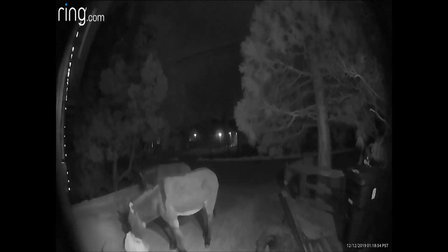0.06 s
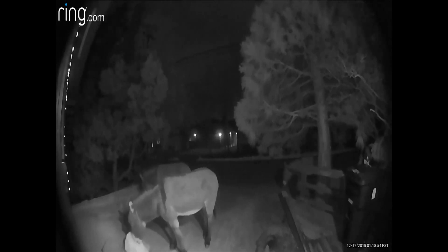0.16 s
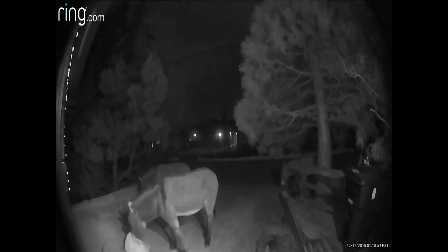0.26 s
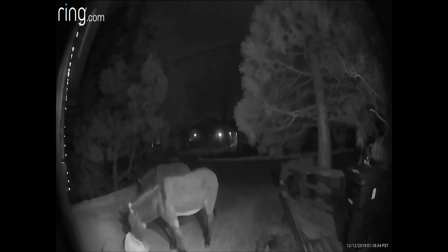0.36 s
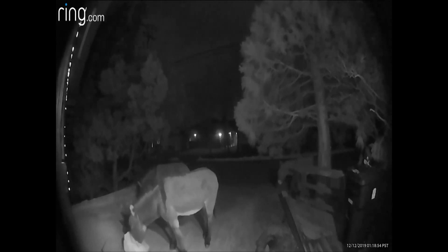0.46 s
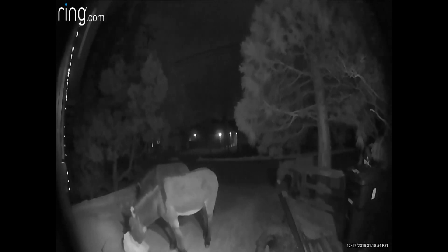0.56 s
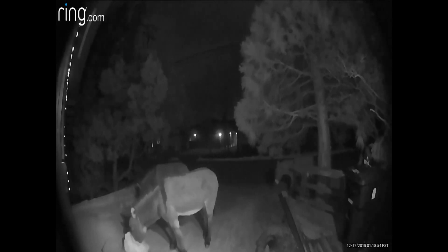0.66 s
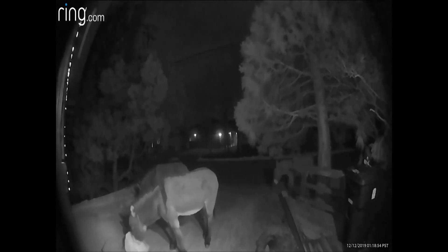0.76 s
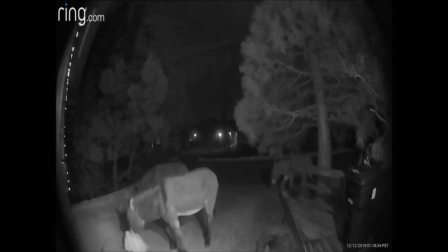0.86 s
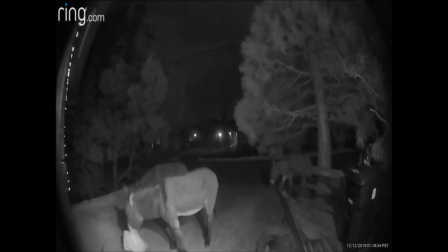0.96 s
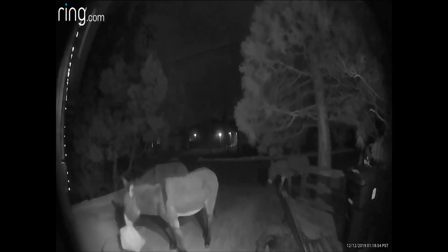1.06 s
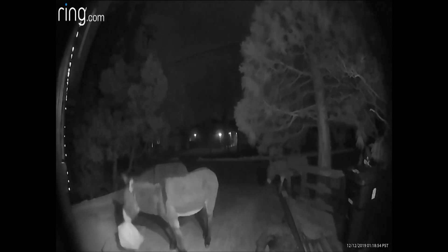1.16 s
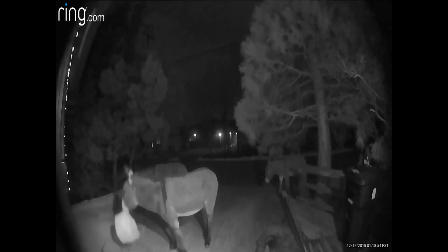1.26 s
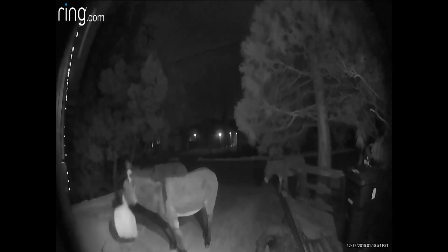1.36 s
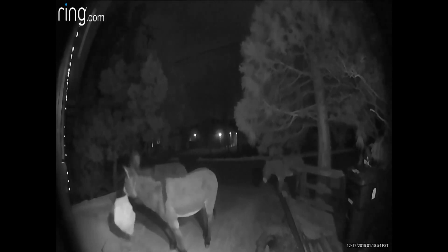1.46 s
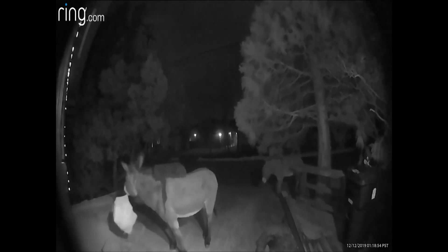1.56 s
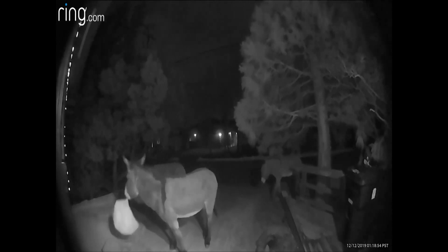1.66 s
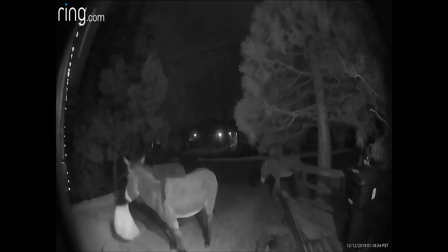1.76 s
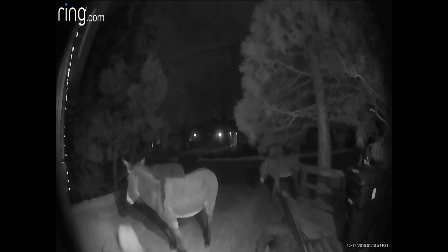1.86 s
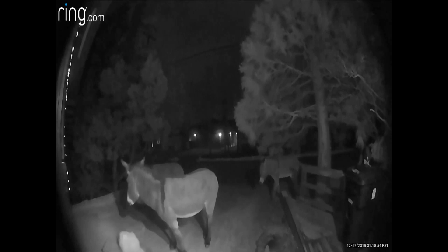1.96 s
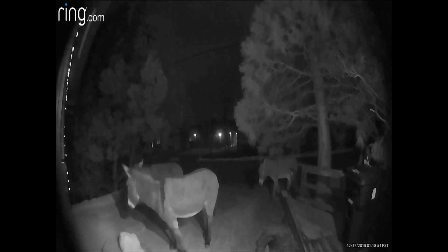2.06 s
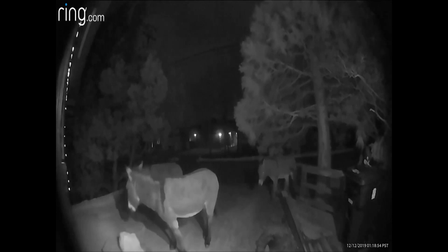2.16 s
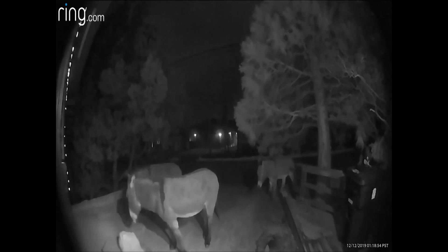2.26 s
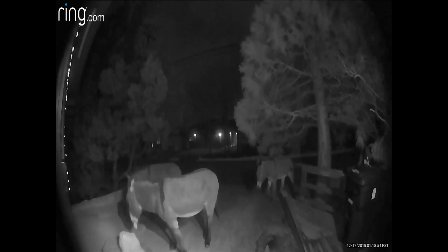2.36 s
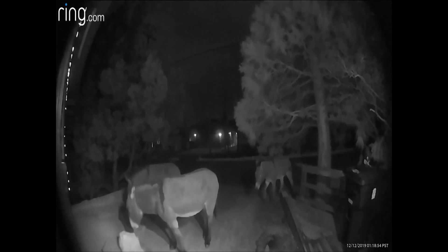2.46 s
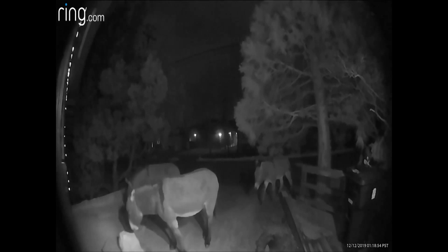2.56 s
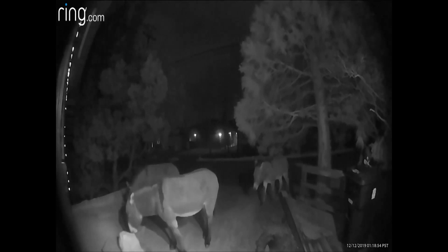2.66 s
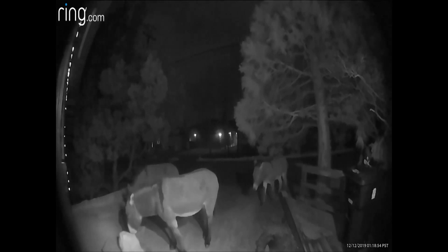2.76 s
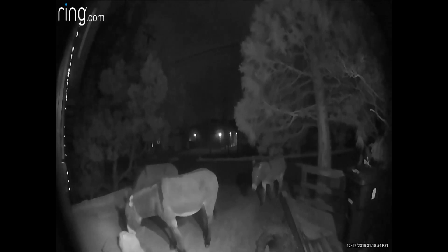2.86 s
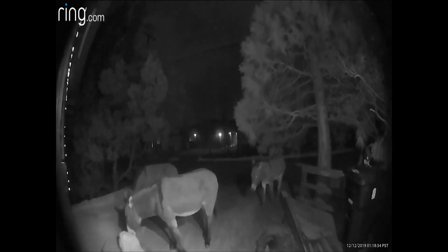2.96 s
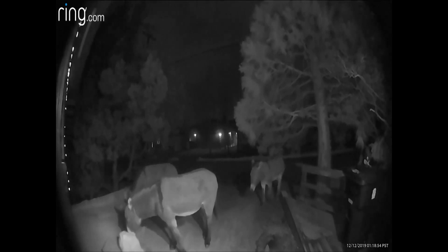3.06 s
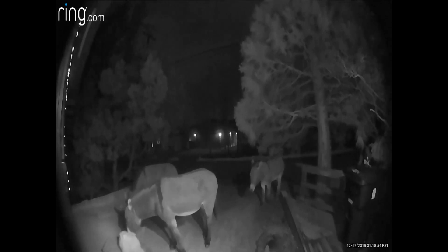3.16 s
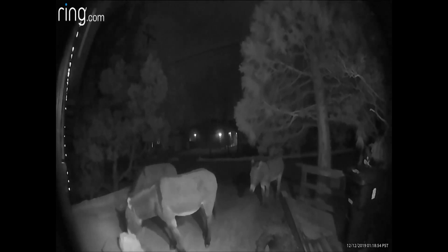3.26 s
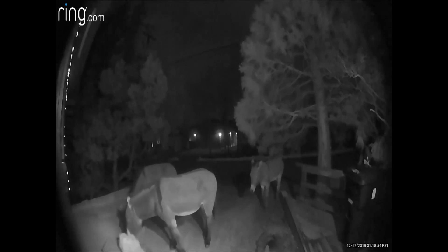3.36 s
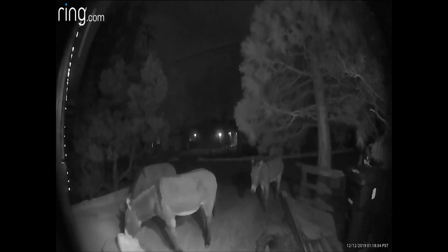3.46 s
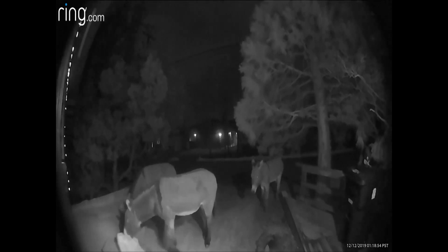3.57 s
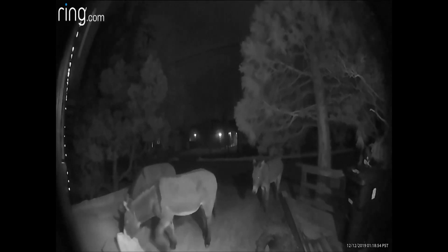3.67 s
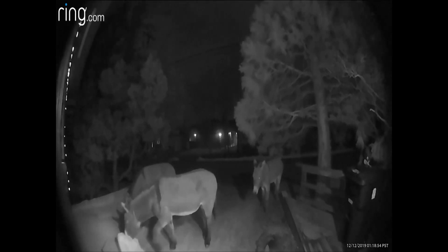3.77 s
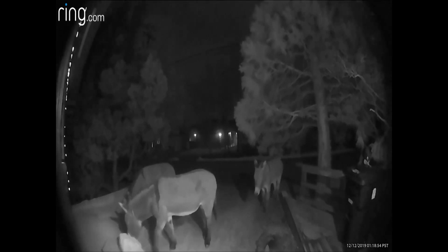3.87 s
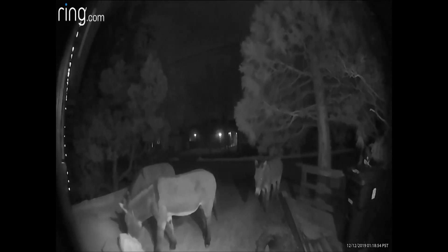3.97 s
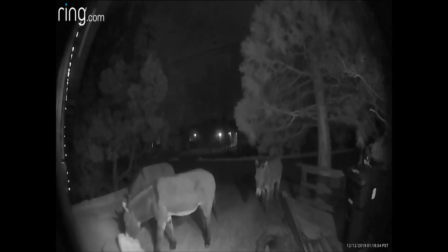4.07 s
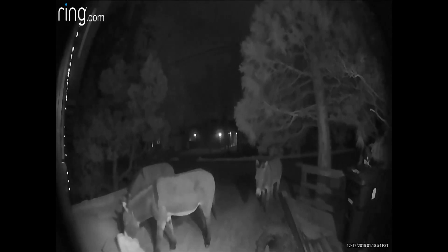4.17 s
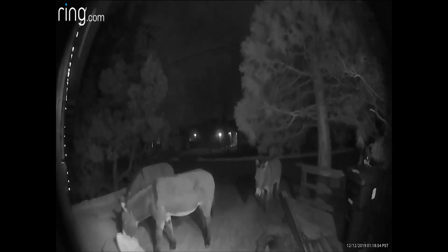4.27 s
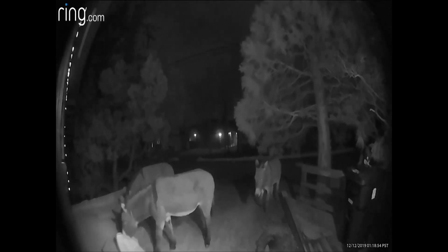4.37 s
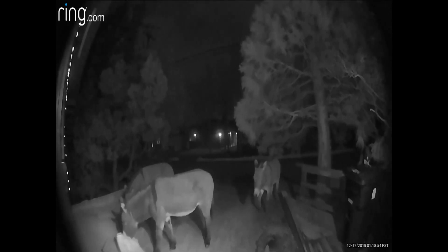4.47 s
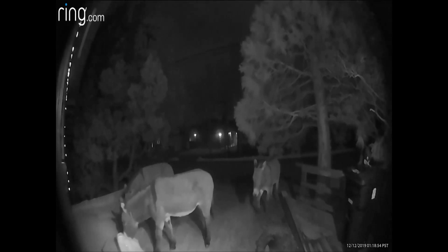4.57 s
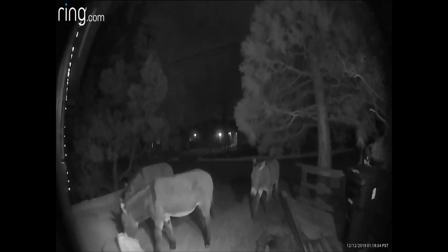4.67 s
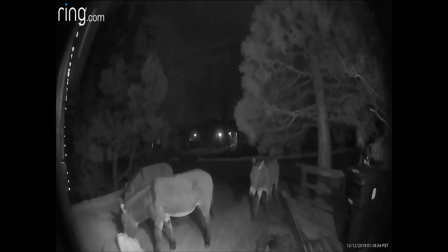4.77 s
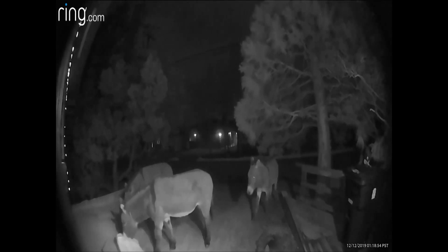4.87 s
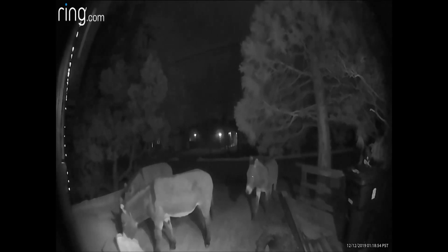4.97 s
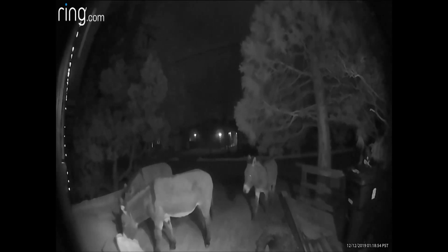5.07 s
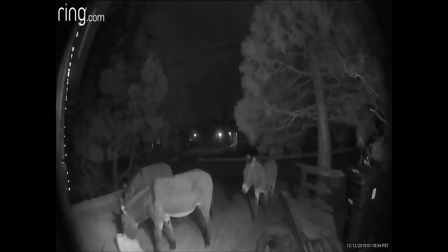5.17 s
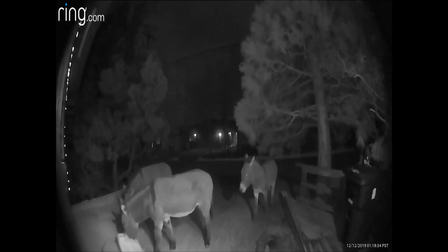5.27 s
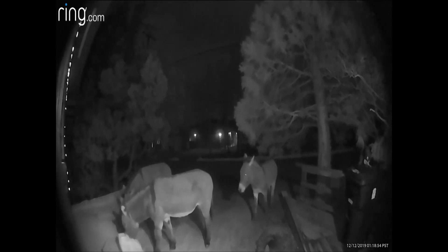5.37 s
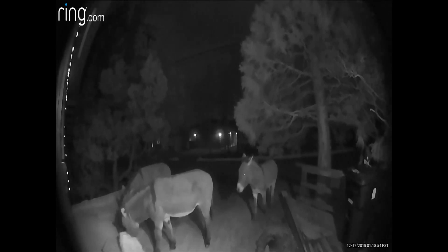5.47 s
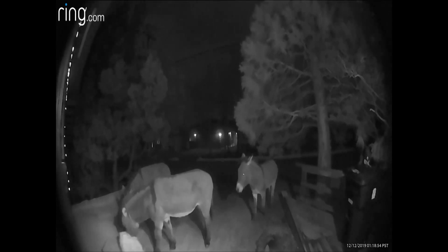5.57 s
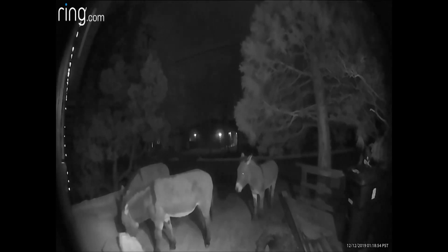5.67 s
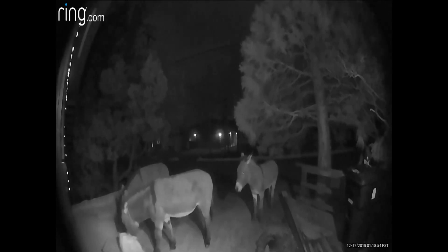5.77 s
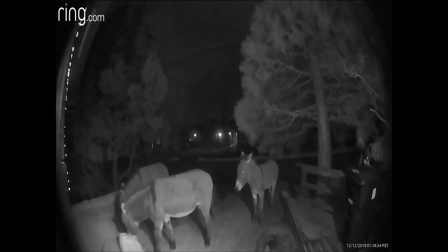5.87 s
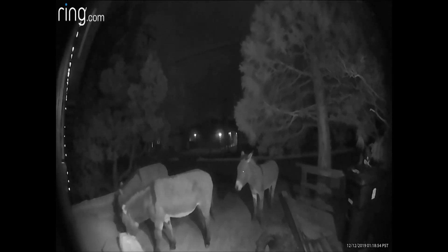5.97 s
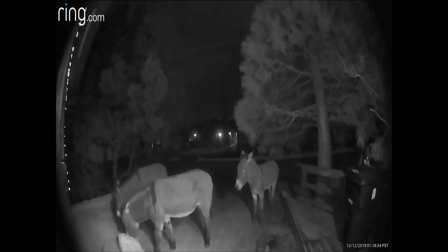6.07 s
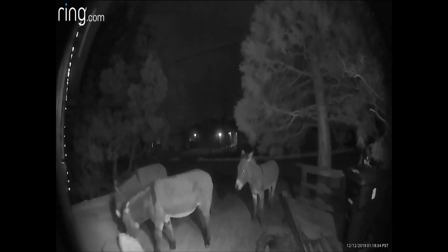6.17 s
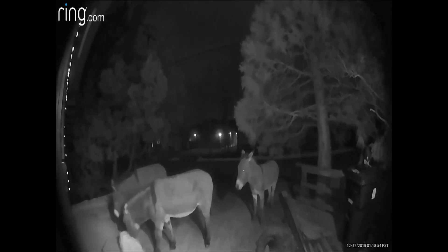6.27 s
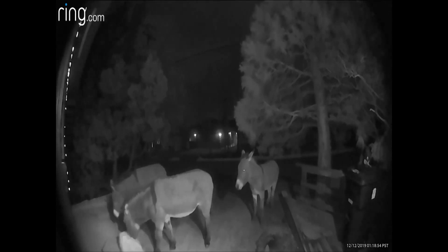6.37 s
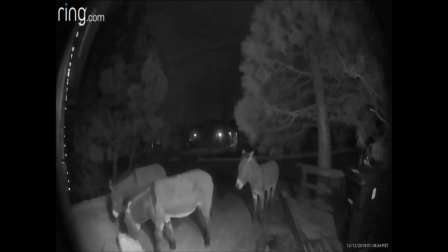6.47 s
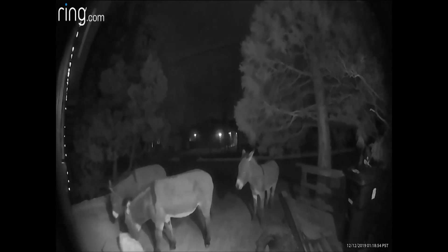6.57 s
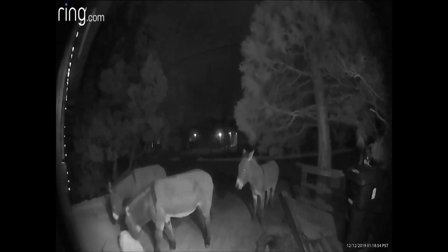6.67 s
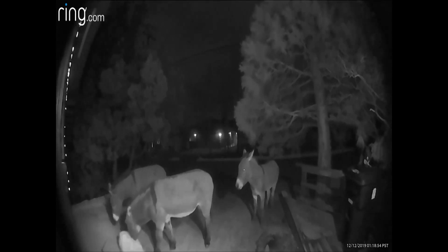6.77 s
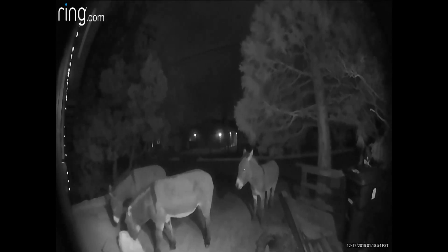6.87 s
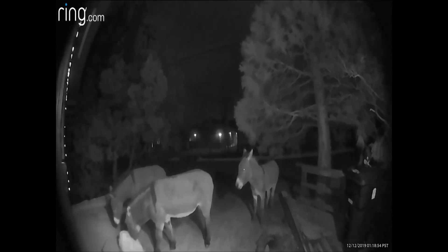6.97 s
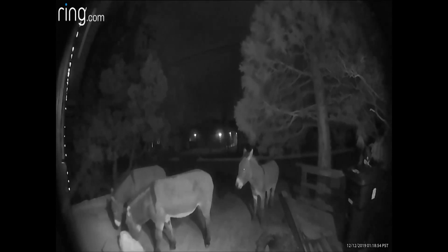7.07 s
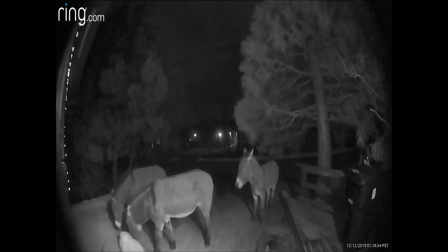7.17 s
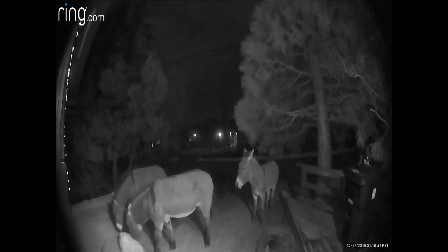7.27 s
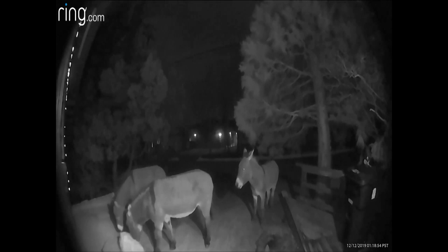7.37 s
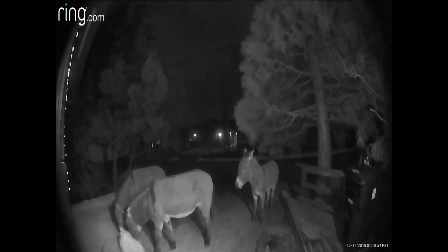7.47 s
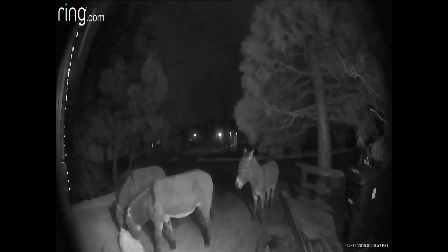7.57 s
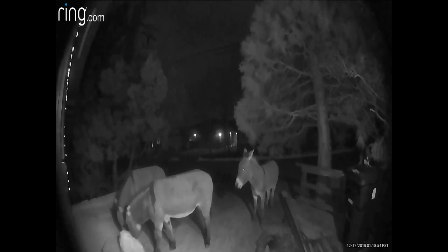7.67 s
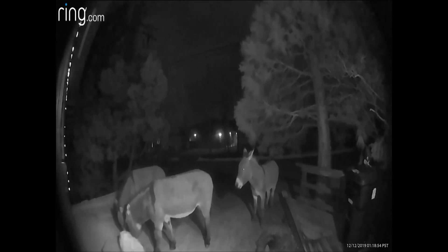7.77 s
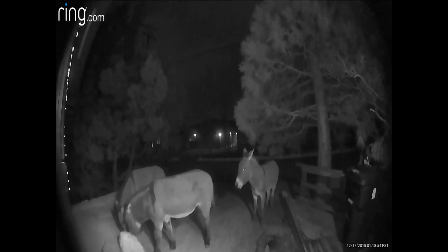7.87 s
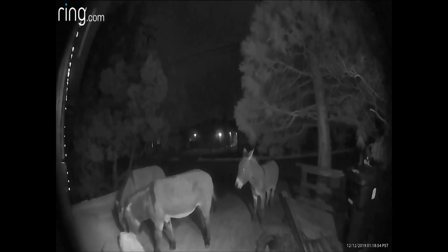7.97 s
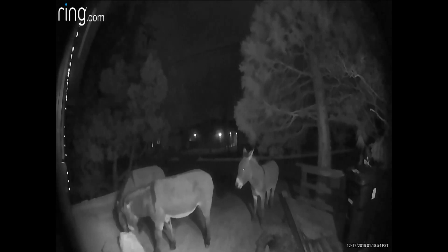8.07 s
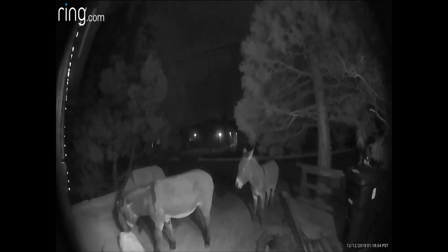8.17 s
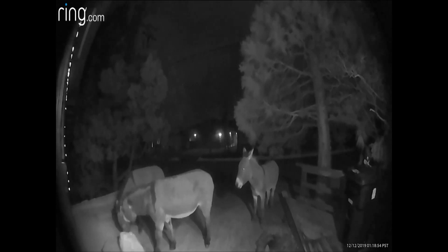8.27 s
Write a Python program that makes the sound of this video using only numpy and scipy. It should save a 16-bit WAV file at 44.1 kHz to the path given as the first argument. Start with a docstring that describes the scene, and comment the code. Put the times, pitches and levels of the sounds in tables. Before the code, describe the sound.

A plastic rubbish bag crackles and clatters as a donkey lifts it, then drops with a dull boom. Soft shuffling and sliding of cardboard, tins and trays go on until a loud snap and several smaller ones cut in. It is outdoors at night, with a brief wall echo, heard through a narrow, faintly hissing door camera microphone that overloads on the loudest snap.

```python
"""A plastic rubbish bag rustles, knocks and snaps as donkeys nose through it on a drive at night.
The bag rubs on the ground, creases pop in its film, and the boxes, tins and trays inside ring when
they knock or slide. Lifted and dropped, it lands with a boom about two seconds in. A wall echoes briefly.
The microphone is a door camera's: narrow in band, overloading on the loudest snaps,
with a faint night hum and its own hiss underneath."""
import sys
import numpy as np
from scipy import signal
from scipy.io import wavfile

SR = 44100
rng = np.random.default_rng(int(sys.argv[2]) if len(sys.argv) > 2 else 0)


def wrap_up_sound(samples):
    """Save the sound to the file named by the first command line argument, as 16-bit audio."""
    columns = np.atleast_2d(samples).T
    # keep every value between -1 and 1, then stretch to whole-number steps
    tamed = np.clip(columns, -1, 1)
    steps = np.round(tamed * 32767).astype(np.int16)
    wavfile.write(sys.argv[1], SR, steps)


N = 367353

# Knocks and snaps in the bag; heavy load, light plastic and boxes are relative to level_db:
# start_s, level_db, heavy_db, light_db, box_db, t60_s
KNOCK_EVENTS = [(0.137, -39, -3, -12, -5.5, 0.14), (0.432, -27, -1.5, -6.5, -4, 0.096),
                (0.664, -49.5, 9, -11, -12, 0.062), (0.723, -36.5, -2, -7, -17.5, 0.11),
                (0.776, -16, -6.5, -10.5, -14, 0.098), (0.806, -17, -8.5, -10, -9.5, 0.16),
                (0.83, -18.5, -4.5, -11, -10.5, 0.21), (0.853, -11, -6, -11, -13.5, 0.11),
                (0.873, -19.5, -22, -1, -20, 0.07), (0.926, -17.5, -2.5, -8, -8, 0.068),
                (0.969, -12, -17, -7.5, -17, 0.044), (0.994, -4.5, -20, -9.5, -15, 0.063),
                (1.106, -8.5, -15.5, -8.5, -9, 0.18), (1.118, -15, -8.5, -10.5, -16, 0.06),
                (1.445, -36.5, -5, -9, -11, 0.33), (1.513, -23, -8, -9, -10, 0.16),
                (1.53, -20.5, -8, -21.5, -6, 0.045), (1.873, -37.5, -15, -8, -6.5, 0.17),
                (1.997, -36, -33, -5.5, -13, 0.24), (2.094, -11.5, 2, -13.5, -8.5, 0.19),
                (2.117, -21.5, -15, 3.5, 4.5, 0.06), (2.217, -40, 6, -18, 1, 0.33),
                (2.406, -44, -1.5, -10, -4, 0.29), (3.299, -52, -6.5, -12, -11, 0.3),
                (4.206, -36.5, -9, -30, -19, 0.14), (4.28, -40.5, -8, -21, -6, 0.14),
                (4.497, -44.5, -16, -28, -12, 0.2), (5.411, -47, -5, -14, -10.5, 0.32),
                (5.544, -35, -4, -23, -4, 0.19), (5.62, 1.5, -13, -11.5, -19, 0.046),
                (5.624, -10, -6, -7, -3, 0.15), (5.794, -33, -27, -15, -9, 0.11),
                (5.954, -44.5, 8, -18, -4, 0.11), (6.223, -52, 0.5, -17, -9, 0.074),
                (6.547, -31.5, 1, -12, -8, 0.15), (6.759, -50, 12, -5.5, -4, 0.079),
                (6.796, -24, -9.5, -8, -18.5, 0.23), (6.804, -8, -20.5, -26, -26, 0.062),
                (6.867, -30, -8, -16, -14.5, 0.23), (6.962, -41, 5.5, -8.5, -0.5, 0.1),
                (7.188, -10, -10.5, -14, -19.5, 0.12), (7.275, -33, -4.5, -13, -12, 0.2),
                (7.598, -33, 2, -20.5, -14, 0.22), (7.934, -37.5, -2, -16, -27, 0.17),
                (8.105, -49, 4, -17.5, -22, 0.25)]
# The load slides and slumps: start_s, level_db, heavy_db, light_db, box_db, t60_s
SLIDE_EVENTS = [(1.039, -23.5, -12, -9.5, -5.5, 0.36), (1.09, -11, -12, -15.5, -16, 0.15),
                (1.159, -33, 5, 3.5, 4, 0.11), (2.073, -13.5, -3.5, -5.5, -8, 0.1),
                (3.437, -37, -9.5, -4, -14.5, 0.32), (3.459, -36, -8.5, -11, -11.5, 0.26),
                (3.6, -45.5, -7, -8, -15, 0.55), (3.72, -48, -16, -7.5, -25, .4),
                (3.96, -37, -10, -9.5, -20, 0.65), (4.012, -46, -5, -15, -31, .57),
                (4.249, -41.5, -8.5, -7.5, -13, 0.38), (4.459, -35.5, -24, -14, -24, 0.17),
                (5.68, -53, -4, 10, 3, .09), (5.802, -48, -6, -1, 8, 0.13),
                (5.914, -38, -6.5, -5.5, -4, 0.25), (6.648, -35, -9, -21, -4, 0.12),
                (7.657, -34.5, -6.5, -12.5, -9.5, 0.22)]
# The bag drags on the ground and its film crinkles: time_s, drag_db, crinkle_db
RUSTLE_LEVELS = [(0.0, -50, -50), (0.28, -59.5, -58.5), (0.72, -53.5, -58.5), (0.81, -52, -53),
                 (0.95, -41, -43), (1.04, -39, -38), (1.18, -46, -51), (1.23, -55.5, -56.5),
                 (1.97, -52, -59), (2.2, -53, -51), (2.32, -49, -54), (2.62, -58.5, -63),
                 (3.06, -66.5, -66), (4.2, -59, -57.5), (4.48, -63.5, -59), (4.78, -59.5, -64),
                 (5.43, -67, -63.5), (5.73, -56, -49), (6.08, -59, -63), (6.52, -59, -58), (6.75, -49, -52),
                 (7.03, -55.5, -57), (7.49, -56.5, -54.5), (8.33, -59.5, -63.5)]
# A lone crease flips: start_s, level_db
CREASE_FLIPS = [(1.0714, -8)]

# Resonances of the six parts that ring: pitch_hz, width_hz, level_db
WHOLE_BAG_MODES = [(120, 58, -20.5), (169, 35, -10.5), (251.9, 39, 3.5)]
HEAVY_LOAD_MODES = [(358.2, 54, 2.5), (399, 57.5, 5), (488, 110, 0), (591.4, 36, -2)]
CARDBOARD_MODES = [(689, 170, -1.1), (804, 58, 5.7), (952, 100, 0), (1159, 100, 1), (1400, 170, -7.5)]
TIN_MODES = [(1422, 120, 11), (1621, 320, 9.8), (1760, 148, 14.5), (2112, 220, 5.4)]
PLASTIC_TRAY_MODES = [(2263, 130, 0.19), (2424, 390, 0), (2602, 120, 0.24), (2818, 64, -2.3)]
STRETCHED_FILM_MODES = [(3170, 340, -3), (3365, 217, -1), (3513, 310, 1.5), (3587, 400, -4)]
# How readily each part rings: bag_db, heavy_db, box_db, tin_db, tray_db, film_db
PART_GAINS_DB = [-11.5, -4, -3.5, -11, -9, -5]
# Added in a slide, which rubs the trays and hardly stretches the film: same columns
SLIDE_GAINS_DB = [0, -0.5, -2, -0.5, 3.5, -9]

# Spectra of the drag, the crinkle and the night hum with hiss: frequency_hz, relative_density_db
DRAG_SPECTRUM = [(60, -34.5), (110, -15), (160, -12), (240, -0.5), (400, -3), (700, -6.5), (1100, -14.5),
                 (2000, -28)]
CRINKLE_SPECTRUM = [(400, -31.5), (800, -5), (1200, -2.5), (1600, 2.5), (2300, -2), (3000, -8), (4500, -13)]
NIGHT_SPECTRUM = [(25, 6), (44, -2.5), (112, -6), (232, -9.5), (357, 0), (610, -16.5), (772, 5.5),
                  (1070, -19), (1500, -15.5), (2800, -31.5), (3600, -4.5), (4500, -9.5)]

KNOCK_BUILD_S, SLIDE_BUILD_S = 0.0013, 0.015   # from first touch to full strength
BLOW_DB = 26   # a knock's opening contact over its burst
DROP_BOOM_DB, DROP_BLOW_DB = 5, -6.5   # the landing bag booms more and its knocks are blunt


def knocks_and_slides():
    """Bursts of small contacts shake the bag and its contents; one firm blow opens each knock."""
    shakes, blows = np.zeros((2, 6, N))
    t = np.arange(SR // 2) / SR
    knocks = [(start_s - KNOCK_BUILD_S, *rest, KNOCK_BUILD_S, 0) for start_s, *rest in KNOCK_EVENTS]
    slides = [(*slide, SLIDE_BUILD_S, SLIDE_GAINS_DB) for slide in SLIDE_EVENTS]
    for start_s, *levels_db, t60_s, build_s, extra_db in knocks + slides:
        rise = np.minimum(t / build_s, 1) ** 1.1
        fall = from_db(-60 * np.maximum(t - build_s, 0) / min(t60_s, .6))
        gains = from_db(part_levels_db(start_s, *levels_db) + extra_db)
        at = round(start_s * SR)
        shakes[:, at:at + len(t)] += np.outer(gains, rise * fall)[:, :N - at]
    for start_s, *levels_db, _ in KNOCK_EVENTS:
        blow_db = BLOW_DB + DROP_BLOW_DB * landing(start_s)
        blows[:, round(start_s * SR)] = from_db(part_levels_db(start_s, *levels_db) + blow_db)
    parts = (WHOLE_BAG_MODES, HEAVY_LOAD_MODES, CARDBOARD_MODES,
             TIN_MODES, PLASTIC_TRAY_MODES, STRETCHED_FILM_MODES)
    ringing = sum(resonate(shake * grains(2.1) + blow, modes, wander_db=2.5)
                  for shake, blow, modes in zip(shakes, blows, parts))
    bass_cut = signal.butter(4, 114, "high", fs=SR, output="sos")
    return signal.sosfilt(bass_cut, ringing)


def part_levels_db(start_s, level_db, heavy_db, light_db, box_db):
    """How hard each part is shaken; the bag's boom grows more steeply with weight than the load's thud."""
    boom_db = 1.17 * heavy_db + DROP_BOOM_DB * landing(start_s)
    return level_db + np.array([boom_db, heavy_db, box_db, 0, light_db, light_db]) + PART_GAINS_DB


def landing(time_s):
    """True while the dropped bag lands and settles on the drive."""
    return 2.05 < time_s < 2.45


def resonate(force, modes, wander_db):
    """Parallel resonances, each swelling and fading as the contacts move about."""
    ringing, power = 0, 0
    for k, (pitch_hz, width_hz, level_db) in enumerate(modes):
        radius = np.exp(-np.pi * width_hz / SR)
        scale = (1 - radius ** 2) / 2
        feedback = [1, -2 * radius * np.cos(2 * np.pi * pitch_hz / SR), radius ** 2]
        gain = from_db(level_db + wander_db * drift(17.6))
        ringing += (-1) ** k * signal.lfilter([scale, 0, -scale], feedback, gain * force + 1e-18)
        power += from_db(2 * level_db) * scale
    return ringing / np.sqrt(power)


def rustle():
    """The bag rubs on the ground; creases in the film pop in clumps."""
    times_s, *levels_db = np.transpose(RUSTLE_LEVELS)
    drag_db, crinkle_db = [np.interp(np.arange(N) / SR, times_s, column) for column in levels_db]
    drag = flickering_bands([grains(2.0), grains(3.5)], DRAG_SPECTRUM, flicker_db=3.5)
    crinkle = flickering_bands([grains(3.4), grains(2.5)], CRINKLE_SPECTRUM, flicker_db=2.5)
    waver = from_db(0.75 * drift(20))
    return waver * (from_db(drag_db) * drag + from_db(crinkle_db) * crinkle)


def crease_flip():
    """A crease flips over: one short dull pulse with no ring."""
    clicks = np.zeros(N)
    makeup = SR / (2 * np.pi * 1100)   # roughly restores the height lost in the low-pass
    for start_s, level_db in CREASE_FLIPS:
        clicks[round(start_s * SR)] = -from_db(level_db) * makeup
    return signal.lfilter(*signal.butter(2, 2600, fs=SR), clicks)


def wall_echo(sound, level_db=-22.5, delay_s=.012, t60_s=0.32, cutoff_hz=12000):
    """The nearby wall and the ground send a short scatter back to the microphone."""
    t = np.arange(SR // 2) / SR
    scatter = rng.standard_normal(len(t)) * from_db(-60 * t / t60_s) * (t > delay_s)
    scatter = signal.lfilter(*signal.butter(1, cutoff_hz, fs=SR), scatter)
    scatter /= np.sqrt(np.sum(scatter ** 2))
    return from_db(level_db) * signal.fftconvolve(sound, scatter)[:N]


def night_hum(level_db=-67):
    """Faint night hum and the camera's hiss, as one gently wavering noise."""
    noise = rng.standard_normal((2, N))
    return from_db(level_db) * flickering_bands(noise, NIGHT_SPECTRUM, flicker_db=1.5)


def flickering_bands(sources, spectrum, flicker_db):
    """Two noises feed alternate third-octave bands of a spectrum; each octave flickers on its own."""
    edges_hz = 25 * 2 ** np.arange(0, 7.7, 1 / 3)
    frequency_hz, density_db = np.transpose(spectrum)
    mix, power = 0, 0
    for k, (low_hz, high_hz) in enumerate(zip(edges_hz, edges_hz[1:])):
        gain = from_db(np.interp(np.log(low_hz * high_hz) / 2, np.log(frequency_hz), density_db))
        power += gain ** 2 * (high_hz - low_hz) * 2 / SR
        if k % 3 == 0:
            flicker = from_db(flicker_db * drift(4.7))
        band = signal.butter(2, [low_hz, high_hz], "band", fs=SR, output="sos")
        mix += gain * flicker * signal.sosfilt(band, sources[k % 2])
    return mix / np.sqrt(power)


def grains(spread_db):
    """Dense clicks of very uneven size; rms 1."""
    return rms_one(rng.standard_normal(N) * from_db(spread_db * np.minimum(rng.exponential(1, N), 5)))


def drift(rate_hz):
    """Slow random wander of spread 1, with about rate_hz changes a second."""
    step, warm_up = 40, 2000
    pole = np.exp(-2 * np.pi * rate_hz * step / SR)
    noise = rng.standard_normal(N // step + warm_up + 2)
    slow = signal.lfilter([1], [1, -2 * pole, pole ** 2], noise)[warm_up:]
    return np.interp(np.arange(N) / step, np.arange(len(slow)), rms_one(slow))


def from_db(db):
    """Gain of a level in dB."""
    return 10 ** (np.asarray(db) / 20)


def rms_one(x):
    """Scaled to rms 1."""
    return x / np.sqrt(np.mean(x ** 2) + 1e-20)


def scene():
    """The drive in mono: the bag in front, its echo and the night behind."""
    bag = rustle() + knocks_and_slides()
    night = night_hum()
    return (bag + crease_flip() + wall_echo(bag) + night)[None]


def record(dry, band_edge_hz=4386, overload=.71, floor_db=-99, cutoff_hz=16000):
    """Door camera microphone: loud peaks bend and the loudest clip, spilling crackle above its band."""
    narrow = signal.sosfilt(signal.cheby2(20, 50, band_edge_hz, fs=SR, output="sos"), dry)
    bent = narrow - .15 * narrow ** 3
    clipped = np.clip(bent, -overload, overload)
    noise_floor = from_db(floor_db) * rng.standard_normal(dry.shape)
    return signal.sosfilt(signal.cheby2(12, 70, cutoff_hz, fs=SR, output="sos"), clipped + noise_floor)


dry = scene()
out = record(dry)
wrap_up_sound(out)
```